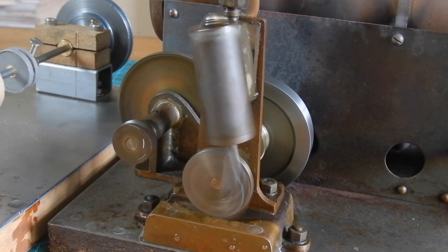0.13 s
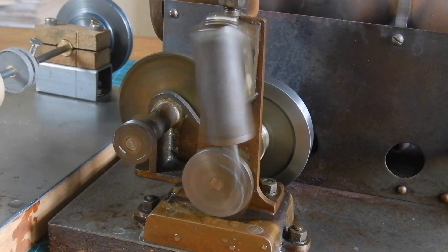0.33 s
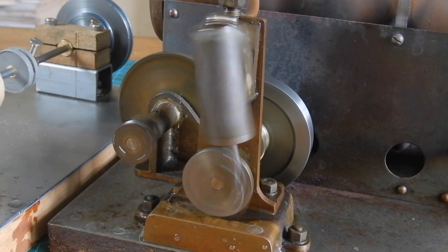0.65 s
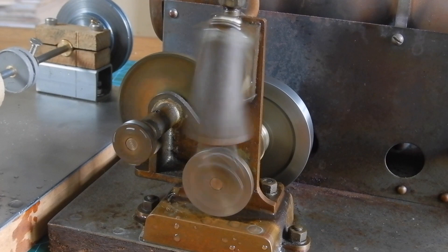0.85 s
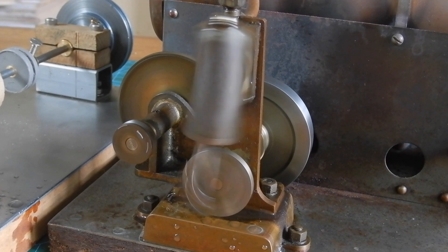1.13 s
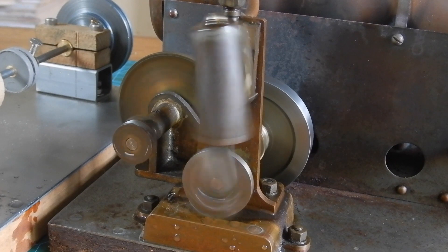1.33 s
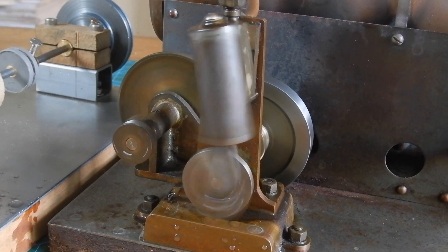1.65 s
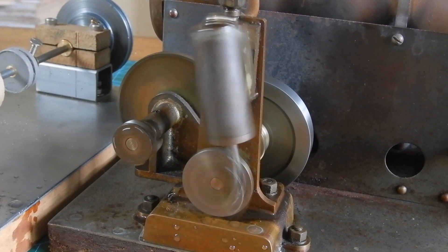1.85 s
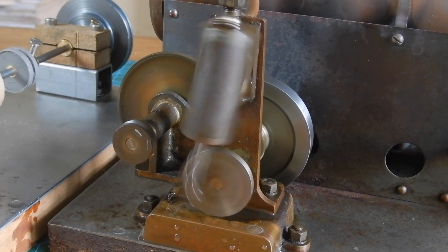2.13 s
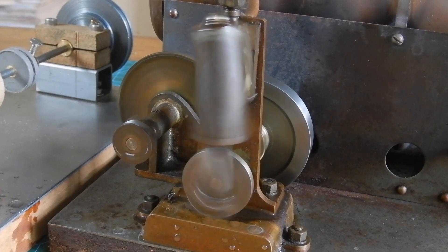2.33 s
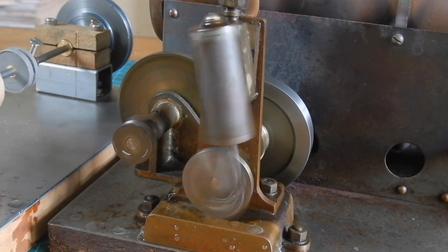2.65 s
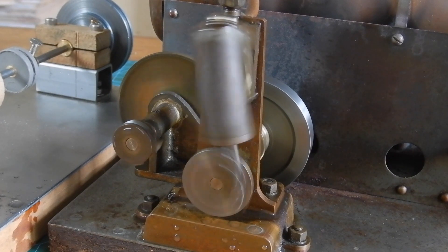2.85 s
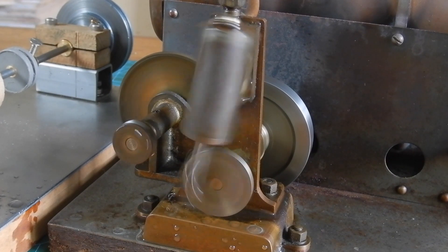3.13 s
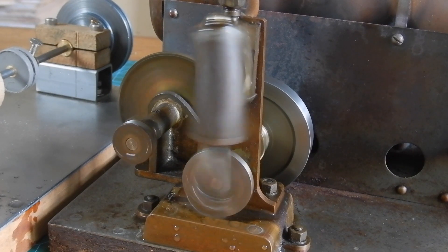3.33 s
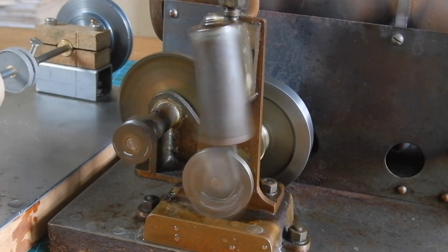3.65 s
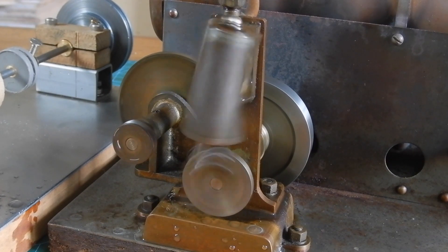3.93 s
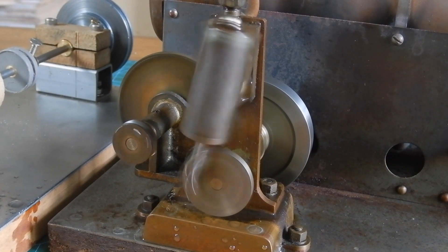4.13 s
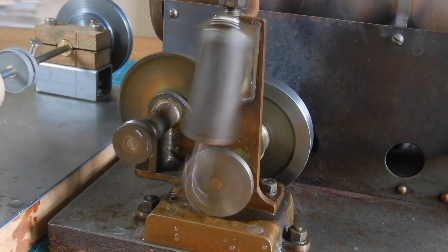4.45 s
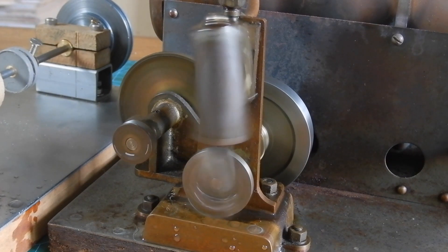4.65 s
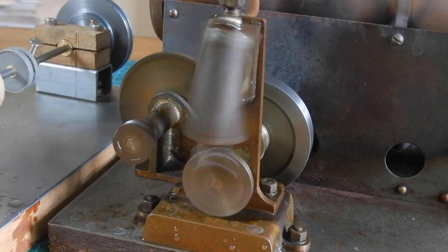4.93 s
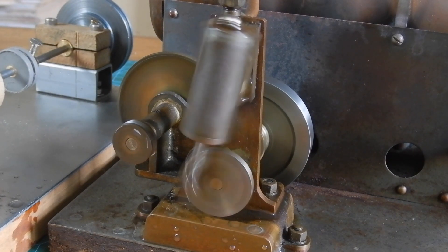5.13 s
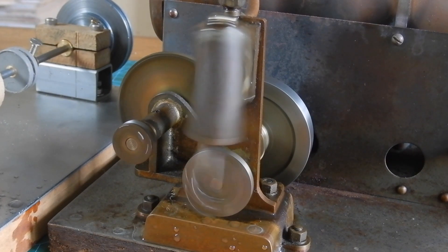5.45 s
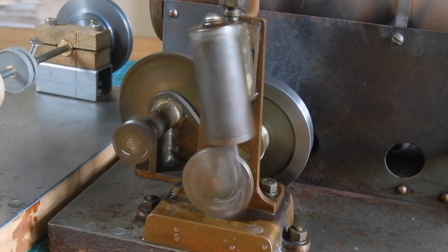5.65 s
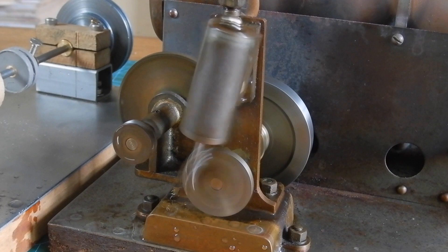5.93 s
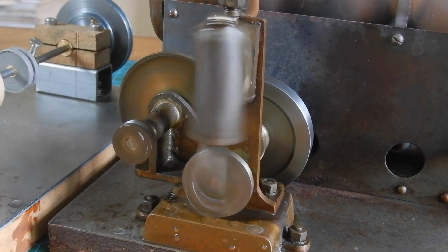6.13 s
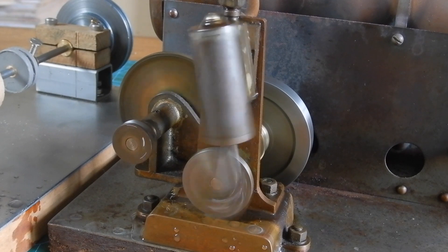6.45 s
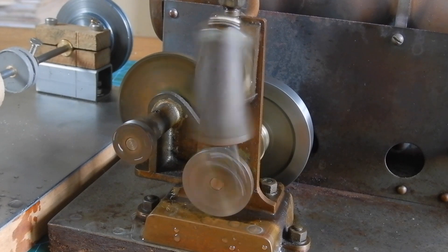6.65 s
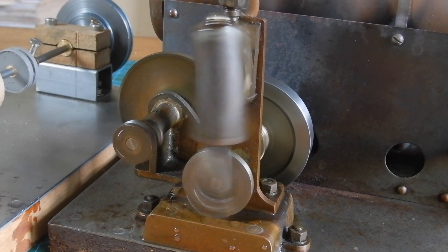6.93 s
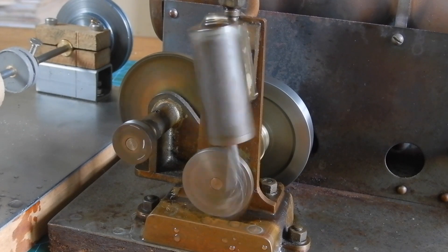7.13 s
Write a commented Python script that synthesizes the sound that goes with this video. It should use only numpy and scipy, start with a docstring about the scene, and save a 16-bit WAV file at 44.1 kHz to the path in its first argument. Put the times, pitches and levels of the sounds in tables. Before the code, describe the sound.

A small steam engine runs fast and steadily close by, rattling with rapid double knocks, short wet exhaust hisses, crackling metal and stray sharp ticks.

```python
"""Rapid double knocks, thumps and hiss: a small oscillating-cylinder steam engine on a steel bench, close by.
At about nine turns a second, crank slack and piston ring the frame's modes; sliding slips crackle.
Noise through a resonant pipe makes the exhaust hiss, pitched bursts the pops of spat water.
Bouncing loose parts tick, some setting the wheel ringing; the bench drones and bumps, the workshop reflects."""
import sys
import numpy as np
from scipy import signal
from scipy.fft import rfft, irfft
from scipy.io import wavfile

SR = 44100
rng = np.random.default_rng(int(sys.argv[2]) if len(sys.argv) > 2 else 0)


def file_out(sig):
    """Save sig as 16-bit WAV at sys.argv[1]."""
    # one column per channel
    cols = np.atleast_2d(sig).T
    # limit, then scale
    lim = np.clip(cols, -1, 1)
    pcm = np.round(lim * 32767).astype(np.int16)
    wavfile.write(sys.argv[1], SR, pcm)


N = 321048

# Flywheel speed. Each row: time in seconds, speed in turns per second.
SPEED_TURNS_PER_S = [(0.0, 9.627), (0.28, 9.506), (0.56, 9.399), (0.84, 9.313), (1.12, 9.243), (1.4, 9.204),
                     (1.68, 9.148), (1.96, 8.979), (2.24, 8.968), (2.52, 8.897), (2.8, 8.988),
                     (3.08, 9.119), (3.36, 9.067), (3.64, 9.066), (3.92, 9.011), (4.2, 9.08), (4.48, 9.101),
                     (4.76, 9.031), (5.04, 8.88), (5.32, 8.818), (5.6, 8.832), (5.88, 8.79), (6.16, 8.778),
                     (6.44, 8.732), (6.72, 8.64), (7.0, 8.683), (7.28, 8.742)]
# Force of the power knock. Each row: time in seconds, relative level in dB.
FORCE_DB = [(0, -4), (2.45, -3.5), (2.75, -7.5), (3.35, -4.5), (4, -6), (4.6, -4), (6.8, -4), (7.1, -6.5)]
# Modes of frame and bench. Each row: frequency in Hz, t60 in seconds, relative level in dB when knocked
# from above, relative level in dB when knocked from below.
FRAME_MODES = [(146.3, 0.07, -40.5, -36), (189.8, 0.062, -36, -63.5), (266.1, 0.2, -38, -55),
               (315.8, 0.2, -45.5, -43.0), (414.5, 0.14, -49, -46), (455.8, 0.14, -55, -50.5),
               (529.6, 0.083, -33, -34), (590.3, 0.19, -54, -50.5), (665.5, 0.069, -36.5, -48),
               (762.3, 0.15, -53, -56), (837, 0.16, -51, -56.5), (919.5, 0.17, -58, -61.5),
               (1017.3, 0.084, -36.5, -50.5), (1218, 0.048, -42, -46.5), (1340, 0.094, -35.5, -57.8),
               (1434, 0.053, -34.5, -49), (1494, 0.056, -38, -58), (1660, 0.1, -47.5, -57),
               (2160, 0.022, -55.5, -69), (2553, 0.035, -51, -70.5)]
# Blows within each knock. Each row: delay in seconds, relative level in dB, brightness in dB per octave,
# rise in seconds.
POWER_BLOWS = [(-.00221, -7, -8.2, .00184), (.00086, -10.3, 6.5, .0032), (.00344, -8.6, 1.7, .0024)]
RETURN_BLOWS = [(0, 0, .3, .0019), (.00415, -12.5, -2, .00175), (.0076, -6, 1.8, .0009)]  # delays before any stretch
HOME_BLOWS = [(0.0012, -9.5, -4.3, 0.00073)]
# Spells of slower bouncing as the slack falls back. Each row: start in seconds, end in seconds,
# relative level in dB.
SOFT_RETURNS = [(0, .2, 1.5), (1.9, 2.12, 0), (2.46, 2.57, -3.5), (2.8, 3.02, -1), (3.9, 4.01, 0.5),
                (5.12, 5.23, -1), (5.69, 6.48, -1.5), (6.95, 7.17, -3)]
# Flow from the exhaust port. Each row: share of a turn, relative level in dB.
PORT_FLOW_DB = [(0, -24), (.06, -14), (.085, 4.5), (.12, 5.5), (.19, -0.5), (.33, -0.5), (.46, -11),
                (.52, -18.5), (1, -36)]
# Quarter-wave resonances of the exhaust pipe. Each row: nominal frequency in Hz, width per pass in Hz,
# relative level in dB.
PIPE_MODES = [(1632, 290, 3.5), (4868, 640, -6)]
# Sliding of piston and port face. Each row: share of a turn, relative level in dB.
SLIDING_DB = [(0, 0.5), (.15, 4.5), (.27, 3), (.4, 0), (.52, -2.5), (.63, -11.5), (.72, 3.5), (.8, -0.5),
              (.92, -3.5), (1, 3)]
# Spectrum of the rubbing. Each row: frequency in Hz, gain in dB.
RUB_COLOUR = [(30, -19), (60, -25), (95, -14), (170, 0.5), (310, 0.5), (370, -3), (520, 1), (860, -8),
              (1150, -16.5), (1330, -4), (1700, -9.5), (2100, -15.5), (4000, -23), (9000, -32)]
# Bench drone. Each row: time in seconds, rms level in dB before waver.
DRONE_DB = [(0, -62), (.35, -59), (.8, -66.5), (1.2, -64.5), (1.6, -59.5), (1.85, -65), (2.3, -63.5),
            (5, -64.5), (6.2, -58), (7.28, -58.5)]
# Dull bumps on the bench. Each row: time in seconds, level in dB, frequency in Hz, t60 in seconds.
BUMPS = [(0.158, -20.5, 242, 0.054), (0.16, -31.5, 118, 0.034), (0.319, -24, 146, 0.1),
         (0.24, -49.5, 70, 0.7), (0.318, -39, 62.7, 0.12), (1.532, -31, 119, 0.066),
         (1.56, -60, 59.5, 0.31)]
# Chatter of loose parts. Each row: share of a turn, scatter in seconds, relative level in dB.
CHATTER = [(.14, .004, -49.5), (.42, .005, -53), (0.241, 0.0052, -50.5), (0.675, 0.0027, -46),
           (.73, 0.0027, -49.5), (.79, .002, -51.5), (.865, 0.0011, -52.5)]
# Spectrum of a tick. Each row: frequency in Hz, gain in dB.
TICK_COLOUR = [(100, -12), (600, -10.5), (1500, 15), (2100, 6.5), (2600, 4), (3100, 2), (3700, 7),
               (4400, -2.5), (6000, -7), (9000, -21.5)]
# Wheel modes. Each row: frequency in Hz, t60 in seconds, relative level in dB.
WHEEL_MODES = [(3832, .4, 3), (2818, .25, -9)]
# Water spat from the exhaust. Each row: time in seconds, level in dB, pitch in Hz, upper pipe resonance
# in relative dB, splash in relative dB.
SPITS = [(0.119, -34, 1600, -8, -10), (0.1312, -28.5, 1700, -2, -7.5), (0.317, -19, 1690, -32, -12),
         (0.43, -28.5, 1680, -13, -28), (0.755, -24.5, 1650, -33, -16), (1.846, -26, 1685, -15.5, -21),
         (2.7323, -29.5, 1720, -20, -14), (3.1693, -23, 1646, -17, -15), (3.5019, -19.5, 1656, -2.5, -21),
         (3.725, -27, 1660, -15.5, -30), (4.2741, -26.5, 1670, -3.5, -15), (4.4906, -22, 1685, -27, -10),
         (4.9453, -29.5, 1690, -23, -18), (5.505, -18.5, 1683, -15.5, -15), (5.7306, -27, 1695, -15, -7),
         (5.841, -25, 1740, -12, -7), (5.862, -22.5, 1700, -29, -23), (6.5282, -14.5, 1670, -14.5, -18.5)]
# Sharpest ticks of loose parts. Each row: time in seconds, relative tick level in dB, wheel ring level in dB.
TICKS = [(0.1625, -33.5, -61), (0.2707, -33.5, -79), (0.474, -40.5, -72), (0.677, -32.5, -59),
         (0.6922, -43, -71), (0.7444, -41, -78), (0.803, -30.5, -60), (0.8558, -31.5, -56),
         (0.91, -31, -76), (1.0145, -37.5, -68), (1.0679, -37, -72), (1.2262, -36, -75), (1.2796, -39, -70),
         (1.4508, -31.5, -74), (1.557, -32, -85), (1.6656, -36.5, -70), (1.7757, -36, -76),
         (1.826, -36.5, -61), (1.8815, -37.5, -66), (1.936, -38, -68), (1.9944, -35.5, -66),
         (2.1708, -34.5, -62), (2.3178, -35.5, -68), (2.445, -34.5, -73), (2.505, -36.5, -68),
         (2.778, -38.5, -70), (2.8329, -33.5, -62.5), (3.1099, -42.5, -70), (3.3334, -34, -65),
         (3.439, -34.5, -90), (3.5571, -29.5, -77), (3.773, -39, -69), (3.824, -32.5, -62),
         (3.8574, -31.5, -57), (3.9419, -35.5, -64), (3.9869, -34.5, -70), (3.9977, -36.5, -58),
         (4.1026, -37, -68.5), (4.213, -33.5, -60.5), (4.3797, -40.5, -75), (4.4382, -34, -69),
         (4.541, -35.5, -61), (4.547, -41, -63), (4.6396, -33, -75), (4.8727, -39, -76),
         (5.1036, -33.5, -74), (5.21, -33, -64.5), (5.272, -35, -68), (5.3296, -35.5, -64),
         (5.4393, -37, -65), (5.5548, -36.5, -68), (5.6649, -37, -72), (5.7202, -41, -65.5),
         (5.7805, -40, -68), (5.8893, -36, -75), (5.954, -36, -66), (5.9935, -33, -69), (6.2842, -39, -77),
         (6.4581, -30.5, -81), (6.5181, -34.5, -71), (6.573, -37, -77), (6.584, -36.5, -71),
         (6.6926, -33.5, -62), (6.814, -30.5, -66), (6.8651, -35, -62), (6.9223, -36, -59),
         (7.0977, -35, -71), (7.269, -31, -70)]
# Swells of the wheel's main mode. Each row: time of the top in seconds, level in dB.
SINGS = [(.895, -45.5), (1.075, -58), (1.53, -58), (2.22, -62), (3.87, -52), (4.02, -58), (6.92, -60)]
# Workshop decay. Each row: frequency in Hz, t60 in seconds.
ROOM_T60_S = [(100, 0.22), (500, 0.28), (1700, 0.36), (4000, 0.32), (9000, 0.25)]
# Level of left ear over right. Each row: frequency in Hz, difference in dB.
LEFT_OVER_RIGHT_DB = [(60, -3.5), (91, -5), (140, 1.5), (210, 5), (320, -4), (490, 1.5), (750, 3),
                      (1150, 3.5), (1750, 0), (2660, 1), (4060, -2), (6180, -5.5)]
# Microphone response. Each row: frequency in Hz, gain in dB.
MIC_DB = [(20, 4), (50, 5), (4900, -1), (5600, -5.5), (6500, -15.5), (7200, -21.5), (9000, -30),
          (13000, -38)]
# Touches of metal on metal. Each row: share of a turn, scatter in seconds, relative level in dB.
TOUCHES = [(-.005, 0.00024, -34.5), (.008, 0.0002, -34), (.013, .0002, -32.5), (.021, 0.00017, -31.5),
           (.038, 0.0002, -37.5), (.333, 0.00058, -36), (.865, 0.00034, -38.5)]
# Spectra of a touch, a splash and the bench rumble. Each row: frequency in Hz, gain in dB.
TOUCH_COLOUR = [(200, -12.0), (1400, 7.5), (2000, 17), (2800, 11.5), (4000, 1), (6000, -4.5), (9000, -19.0)]
SPLASH_COLOUR = [(150, -22.0), (700, -18.5), (1500, -9.5), (2500, 15.0), (3300, 6.5), (4100, -9.0),
                 (5500, -14.5), (9000, -7.5), (13000, -14)]
RUMBLE_COLOUR = [(15, -12.0), (40, -2.0), (60, 7.5), (120, 5.0), (300, -19.0), (3000, -45.0)]

START_TURN, USUAL_TURNS_PER_S = .1094, 9  # start is in turns past a power knock
RETURN_AT_TURN, HOME_AT_TURN = .3125, .752  # slack falls back, piston thumps
SOFT_STRETCH, BOUNCE_SCATTER = .13, .018  # shares of the bounce delay
EXHAUST_DB_PER_SPEED, EXHAUST_SCATTER_DB = 2.7, 1.1  # dB per extra turn a second
RUBBING_DB_PER_SPEED, RUBBING_SCATTER_DB = 2.4, 1.2
RIM_HZ, RIM_T60_S = 6409, .5

TIME_S = np.arange(N) / SR
SPEED = np.interp(TIME_S, *np.transpose(SPEED_TURNS_PER_S))
TURNS = START_TURN + np.cumsum(SPEED) / SR  # crank angle, in turns
TURN_COUNT = int(TURNS[-1]) + 1


def amp(db):
    """Amplitude of a level in dB."""
    return 10 ** (np.asarray(db) / 20)


def unit(x):
    """Scales to rms 1."""
    return x / np.sqrt(np.mean(x ** 2) + 1e-20)


def read(points, hz):
    """A table's value on a log-frequency axis."""
    f, value = np.transpose(points)
    return np.interp(np.log(hz + 1), np.log(f + 1), value)


def curve(points, at):
    """Gain along a table of dB."""
    return amp(np.interp(at, *np.transpose(points)))


def clicks(times_s, sizes):
    """A train of impulses."""
    at, out = np.round(times_s * SR).astype(int), np.zeros(N)
    inside = (at >= 0) & (at < N)
    np.add.at(out, at[inside], sizes[inside])
    return out


def through(x, response):
    """Convolution with an impulse response."""
    return signal.oaconvolve(x, response)[:N]


def colour(points):
    """Causal impulse response with this spectrum (minimum phase)."""
    log_gain = np.log(amp(read(points, abs(np.fft.fftfreq(4096, 1 / SR)))))
    spectrum = np.exp(np.conj(signal.hilbert(log_gain)))
    return np.fft.ifft(spectrum).real[:len(log_gain) // 2]


def ring(hz, t60_s, rise_s):
    """One mode that swells for a moment and dies away."""
    t = TIME_S[:SR // 2]
    decay = np.exp(-np.log(1000) * t / t60_s)
    swell = 1 - np.exp(-(t / rise_s) ** 2)
    return np.sin(2 * np.pi * hz * t) * decay * swell


def wander(rate_hz):
    """Smooth chance of rms 1."""
    knots = rng.standard_normal(N // 20)
    return unit(np.interp(TIME_S * rate_hz, np.arange(len(knots)), knots))


def moments(share, scatter_s):
    """Times when the crank passes this share of each turn."""
    times_s = np.interp(np.arange(TURN_COUNT) + share, TURNS, TIME_S, left=-1, right=-1)
    return times_s + scatter_s * rng.standard_normal(TURN_COUNT)


def effort(db_per_speed, scatter_db):
    """A gain that follows the speed and differs a little from turn to turn."""
    luck = np.interp(TURNS, np.arange(TURN_COUNT), rng.standard_normal(TURN_COUNT))
    return amp(db_per_speed * (SPEED - USUAL_TURNS_PER_S) + scatter_db * luck)


def resonate(x, hz, width_hz):
    """A resonance that follows the curve hz: shift to zero, smooth, shift back."""
    turn = np.exp(2j * np.pi * np.cumsum(hz) / SR)
    r = np.exp(-np.pi * width_hz / SR)
    return 2 * (turn * signal.lfilter([1 - r], [1, -r], x / turn)).real


def radiated(x):
    """The small frame moves little air below its lowest mode."""
    return signal.sosfilt(signal.butter(3, 125, "highpass", fs=SR, output="sos"), x)


def light_modes():
    """What a small sharp blow stirs in the frame: its higher modes."""
    return sum(amp(db) * ring(hz, t60_s, .0003) for hz, t60_s, db, _ in FRAME_MODES if hz > 600)


def exhaust(hiss_db=-53, glide_per_turn=0.22, waver=0.019, sputter_db=3):
    """Wet steam sputters through the short pipe while the port is open; its pitch climbs as it blows clear."""
    steam = rng.standard_normal(N) * curve(PORT_FLOW_DB, TURNS % 1)
    jet = steam * effort(EXHAUST_DB_PER_SPEED, EXHAUST_SCATTER_DB) * amp(sputter_db * wander(500))
    bend = 1 + glide_per_turn * (np.minimum(TURNS % 1, .4) - .15) + waver * wander(40)
    pipe = np.zeros(N)
    for hz, width_hz, db in PIPE_MODES:
        once = resonate(jet, hz * bend, width_hz)
        pipe += amp(db) * unit(resonate(once, hz * bend, width_hz))
    return amp(hiss_db) * unit(pipe)


def rubbing(rub_db=-48, ringing_db=-54, grain_db=4.5, grains_per_s=2200, load_share=0.62):
    """Tiny slips of the sliding faces crackle and stir the frame's modes, more so under load."""
    sliding = curve(SLIDING_DB, TURNS % 1) * effort(RUBBING_DB_PER_SPEED, RUBBING_SCATTER_DB)
    loaded = sliding * curve(FORCE_DB, TIME_S) ** load_share
    sizes = amp(grain_db * np.minimum(rng.exponential(1, N), 4)) * rng.choice([-1, 1], N)
    slips = loaded * sizes * (rng.random(N) < grains_per_s / SR)
    body = 0
    for hz, t60_s, db, _ in FRAME_MODES:
        tilt_db = 11.0 * np.log2(min(hz, 1700) / 500)
        body = body + amp(db + tilt_db) * ring(hz, t60_s, 0.00021)
    crackle = unit(through(slips, colour(RUB_COLOUR)))
    return amp(rub_db) * crackle + amp(ringing_db) * unit(through(slips, body))


def bench(rumble_db=-69, waver_db=2.0, order=6):
    """The bench drones at a multiple of engine speed, rumbles faintly and takes a few dull bumps."""
    drone_gain = np.sqrt(2) * curve(DRONE_DB, TIME_S) * amp(waver_db * wander(8.9))
    drone = drone_gain * np.sin(2 * np.pi * order * TURNS)
    rumble = unit(through(rng.standard_normal(N), colour(RUMBLE_COLOUR)))
    bumps = sum(through(clicks(np.array([s]), amp([db])), ring(hz, t60_s, 0.0042))
                for s, db, hz, t60_s in BUMPS)
    return drone + amp(rumble_db) * rumble + bumps


def rattle(times_s, db, wheel_db, bounce_db=-4.0, bounce_s=.00045, frame_db=6.3, rim_db=-62, hard_db=-14,
           count=8):
    """A loose part buzzes through a quick run of bounces, stirs the frame and sets the wheel ringing."""
    luck = rng.random((len(times_s), count, 2))
    # it lands twice: delay in seconds, level in dB
    landings = (0, 0), (rng.uniform(.003, .007, len(times_s)), -7)
    train = np.zeros(N)
    for k in range(count):
        bounce_delay_s = (k + .8 * luck[:, k, 0]) * bounce_s
        sign = np.sign(luck[:, k, 1] - .5)
        for late_s, softer_db in landings:
            sizes = amp(db + softer_db + k * bounce_db) * sign
            train += clicks(times_s + late_s + bounce_delay_s, sizes)
    wheel = sum(amp(level_db) * ring(hz, t60_s, 0.00083) for hz, t60_s, level_db in WHEEL_MODES)
    # the high rim ring favours hard ticks: 2 dB per dB, up to a cap
    rim_level_db = rim_db + 2 * np.minimum(db - hard_db, 1)
    rim = through(clicks(times_s, amp(rim_level_db)), ring(RIM_HZ, RIM_T60_S, .0005))
    tick = through(train, colour(TICK_COLOUR))
    frame = amp(frame_db) * through(train, light_modes())
    return tick + frame + through(clicks(times_s, amp(wheel_db)), wheel) + rim


def chatter(chatter_db=15, ring_db=-32, uneven_db=3):
    """Faint ticks of the play in the pivot, most of them on the return stroke."""
    times_s = np.concatenate([moments(share, scatter_s) for share, scatter_s, _ in CHATTER])
    luck = np.minimum(rng.standard_normal(len(times_s)), 2)
    db = np.repeat(np.transpose(CHATTER)[2], TURN_COUNT) + uneven_db * luck
    return rattle(times_s, db + chatter_db, db + ring_db)


def strike(times_s, db, blows, mode_db, stretch=1):
    """Blows ring the frame's modes, a little differently each time; neighbours swing in opposite directions."""
    out = np.zeros(N)
    for delay_s, blow_db, brightness_db_per_octave, rise_s in blows:
        for k, (hz, t60_s, *_) in enumerate(FRAME_MODES):
            tilt_db = brightness_db_per_octave * np.log2(hz / 500)
            luck_db = .8 * rng.standard_normal(TURN_COUNT)
            size = amp(db + blow_db + mode_db[k] + tilt_db + luck_db)
            hits = clicks(times_s + delay_s * stretch, size)
            out += (-1) ** k * through(hits, ring(hz, t60_s, rise_s)[:SR // 4])
    return out


def knocks(power_knock_db=4.0, return_knock_db=-.5, home_thump_db=-0.05):
    """Steam takes up the crank's slack, lets it fall back bouncing, and the piston thumps on its way home."""
    _, _, above_db, below_db = np.transpose(FRAME_MODES)
    power_s = moments(0, .00004)
    back_s = moments(RETURN_AT_TURN, .0003)
    home_s = moments(HOME_AT_TURN, .0005)
    spells = np.array([(start < back_s) & (back_s < end) for start, end, _ in SOFT_RETURNS])
    # bounces slow down in soft spells and vary each turn, so the ring wavers
    stretch = 1 + SOFT_STRETCH * spells.any(0) + BOUNCE_SCATTER * rng.standard_normal(TURN_COUNT)
    power_db = power_knock_db + np.interp(power_s, *np.transpose(FORCE_DB))
    back_db = return_knock_db + np.transpose(SOFT_RETURNS)[2] @ spells
    power = strike(power_s, power_db, POWER_BLOWS, above_db)
    back = strike(back_s, back_db, RETURN_BLOWS, below_db, stretch)
    home = strike(home_s, home_thump_db, HOME_BLOWS, above_db)
    return radiated(power + back + home)


def contacts(uneven_db=1.3):
    """Metal meets metal at fixed points of the turn: each touch is a short tick."""
    spread_db = uneven_db * rng.standard_normal((len(TOUCHES), TURN_COUNT))
    train = np.zeros(N)
    for (share, scatter_s, db), luck_db in zip(TOUCHES, spread_db):
        train += clicks(moments(share, scatter_s), amp(db + luck_db))
    return through(train, colour(TOUCH_COLOUR))


def spits(length_s=0.006, upper_length_s=0.0027, pop_db=0, splash_db=17, frame_db=9):
    """A slug of water cracks out of the pipe, which sings for a few cycles and jolts the frame."""
    times_s, db, _, _, crack_db = np.transpose(SPITS)
    # the slug breaks in two
    cracks = clicks(times_s + 0.00043, amp(db + crack_db))
    cracks += clicks(times_s + 0.0011, amp(db + crack_db - 11.0))
    out = amp(splash_db) * through(cracks, colour(SPLASH_COLOUR))
    out += through(clicks(times_s, amp(db + frame_db)), light_modes())
    upper_hz = PIPE_MODES[1][0]
    for start_s, level_db, pitch_hz, upper_db, _ in SPITS:
        for hz, span_s, part_db in ((pitch_hz, length_s, 0), (upper_hz, upper_length_s, upper_db)):
            t = TIME_S[:int(span_s * SR)]
            envelope = np.sin(np.pi * (t / span_s) ** 0.34)  # quick rise, slower fall
            burst = np.sin(2 * np.pi * hz * t) * envelope
            out[int(start_s * SR):][:len(t)] += amp(pop_db + level_db + part_db) * burst
    return out


def ticks(tick_db=16.0):
    """The sharp ticks of loose parts that stand out of the chatter."""
    times_s, db, wheel_db = np.transpose(TICKS)
    return rattle(times_s, db + tick_db, wheel_db)


def singing(swell_s=.11):
    """The wheel's main mode sings: a thin tone swells, flutters and fades."""
    swell = sum(amp(db) * np.cos(np.pi * np.clip((TIME_S - top_s) / swell_s, -.5, .5)) ** 2
                for top_s, db in SINGS)
    flutter = amp(2.5 * wander(60))
    return swell * flutter * np.sin(2 * np.pi * WHEEL_MODES[0][0] * TIME_S + .4 * wander(40))


def room(x, apart_db=-3):
    """Workshop reflections: sparse taps dying band by band, partly shared by the two ears."""
    shape = 2, SR // 2
    signs = rng.choice([-1., 1.], shape)
    taps = signs * (rng.random(shape) < .06) * (TIME_S[:SR // 2] > .007)
    hz, t, bands = signal.stft(taps, SR, nperseg=256)
    decay = np.exp(-np.log(1000) * t / read(ROOM_T60_S, hz)[:, None])
    tails = signal.istft(bands * decay, SR, nperseg=256)[1]
    shared, apart = (through(x, tail / np.linalg.norm(tail)) for tail in tails)
    return shared + amp(apart_db) * np.array([apart, -apart])


def scene(room_db=-13.0, left_lag_s=.000015):
    """The engine is close to the microphone pair; its sound spreads into the workshop."""
    engine = knocks() + contacts() + ticks() + chatter() + radiated(rubbing()) + exhaust() + spits() + singing()
    hz = np.fft.rfftfreq(N, 1 / SR)
    level = amp(np.outer([.5, -.5], read(LEFT_OVER_RIGHT_DB, hz)))
    lag = np.exp(-2j * np.pi * np.outer([left_lag_s, 0], hz))
    direct = irfft(rfft(engine + bench()) * level * lag, N)
    return direct + amp(room_db) * room(engine)


def record(dry, edge_hz=13000):
    """A dull microphone, then the band limit."""
    edge = signal.butter(12, edge_hz, fs=SR, output="sos")
    return np.array([signal.sosfilt(edge, through(side, colour(MIC_DB))) for side in dry])


dry = scene()
out = record(dry)
file_out(out)
```